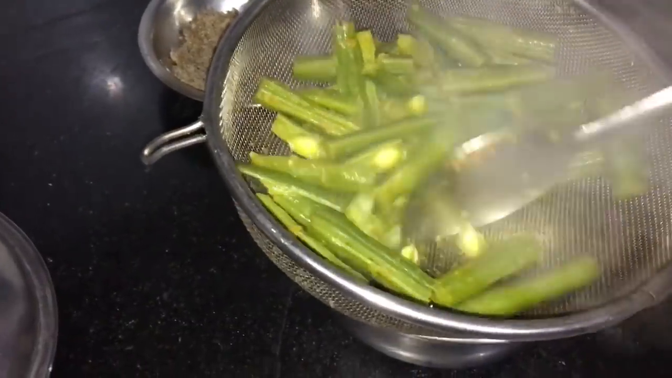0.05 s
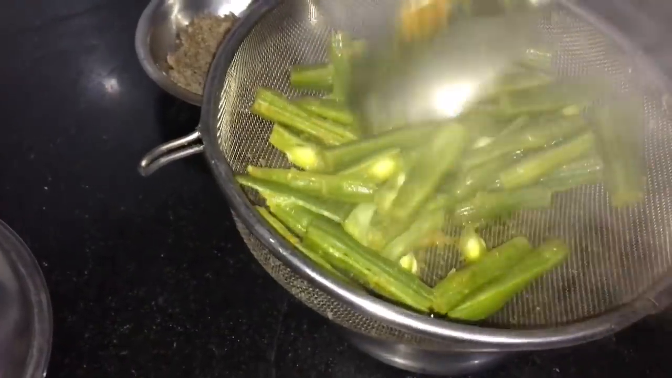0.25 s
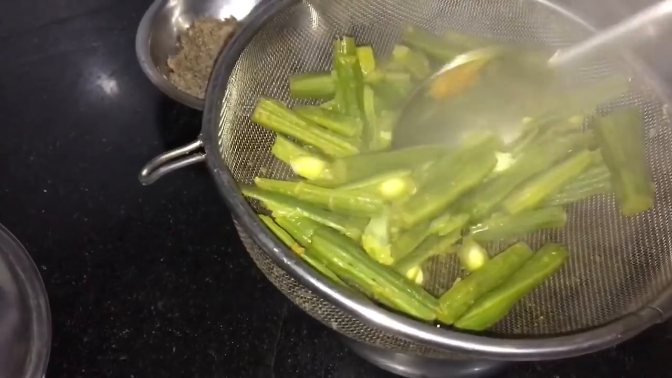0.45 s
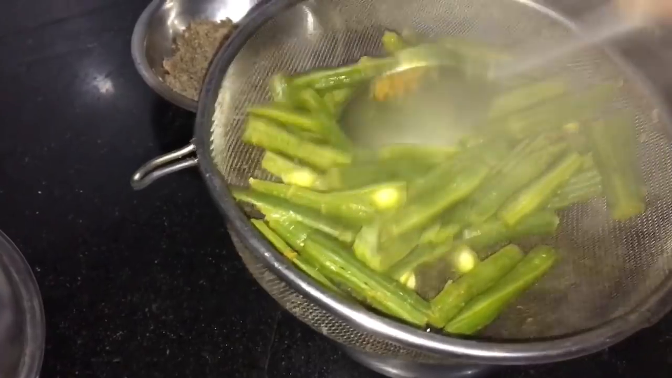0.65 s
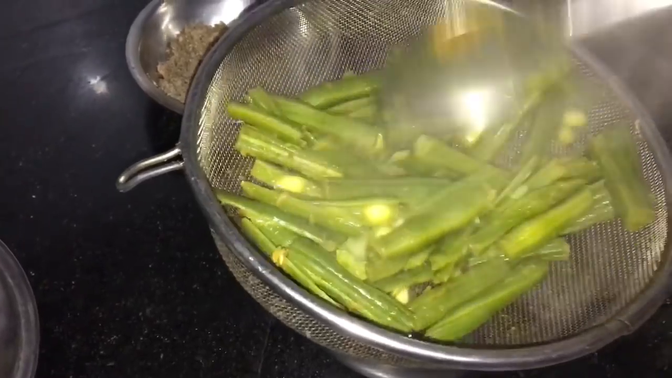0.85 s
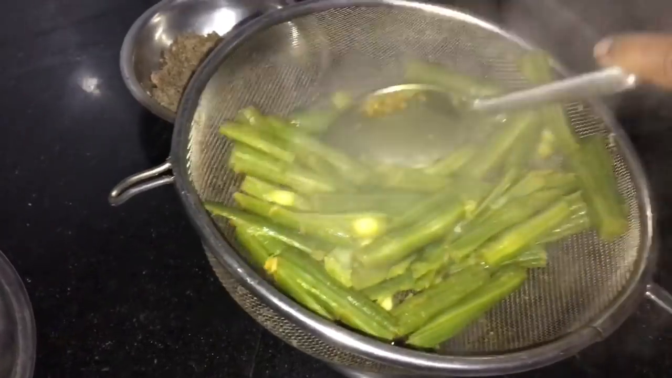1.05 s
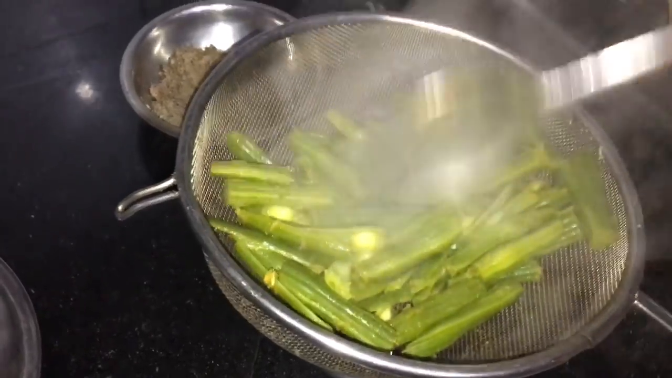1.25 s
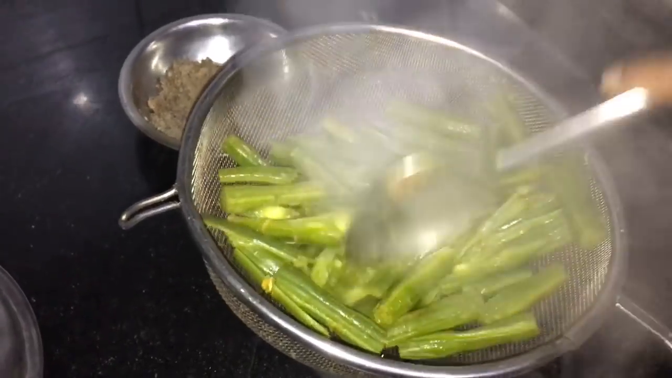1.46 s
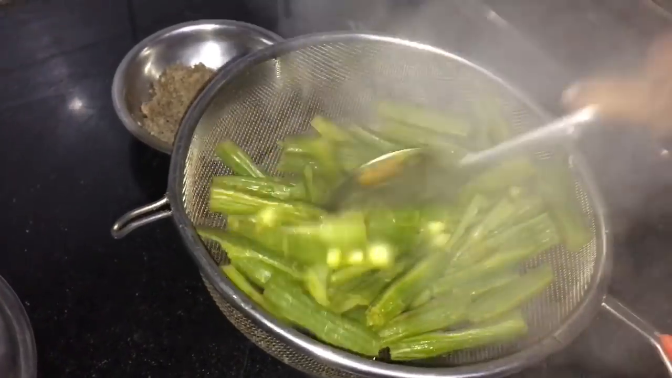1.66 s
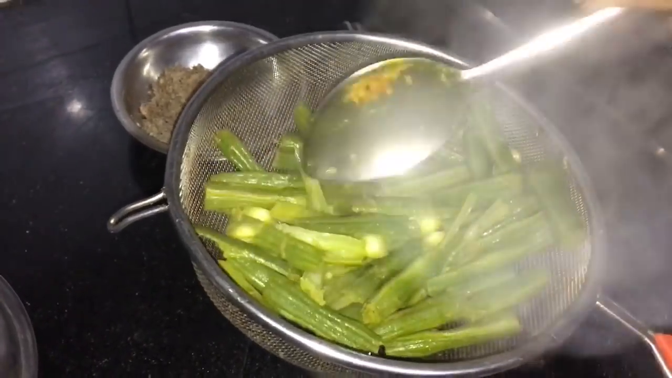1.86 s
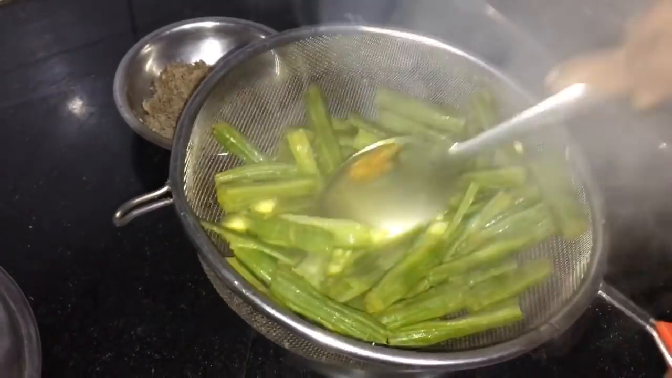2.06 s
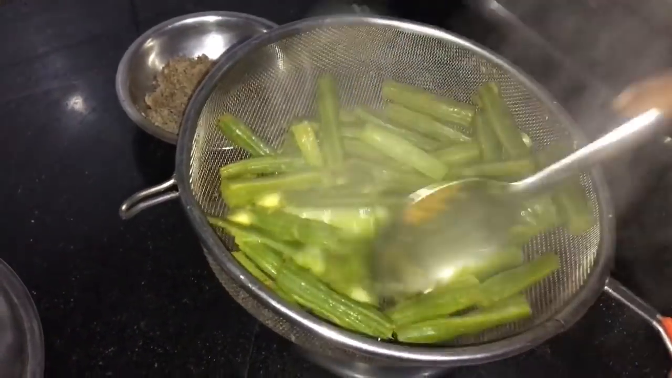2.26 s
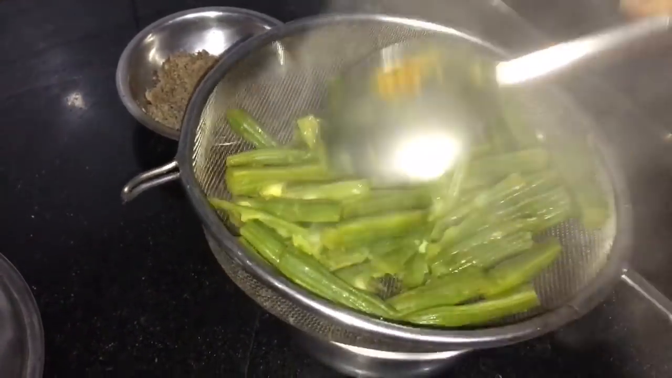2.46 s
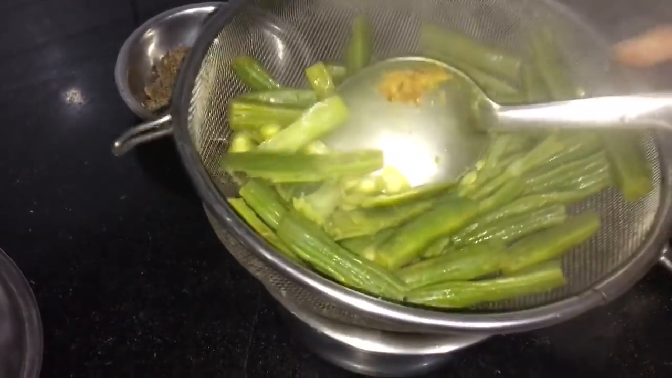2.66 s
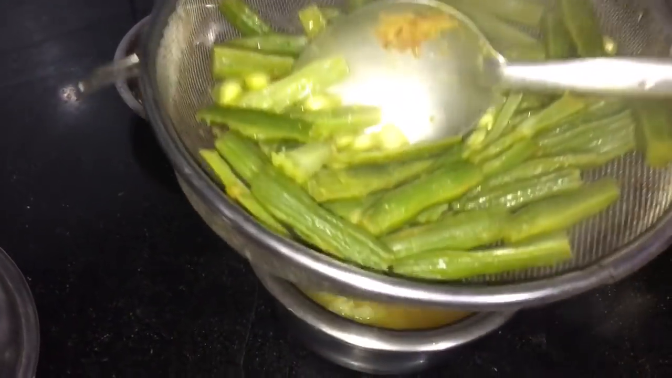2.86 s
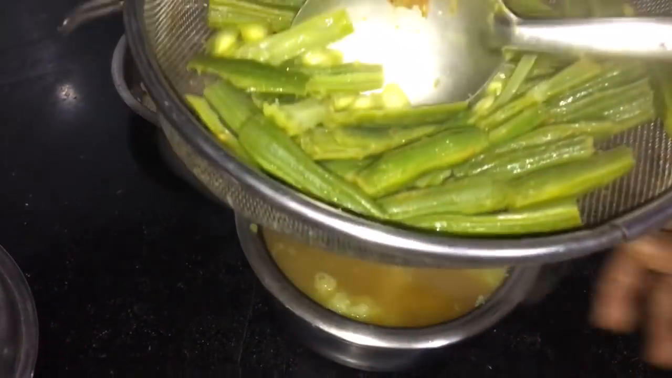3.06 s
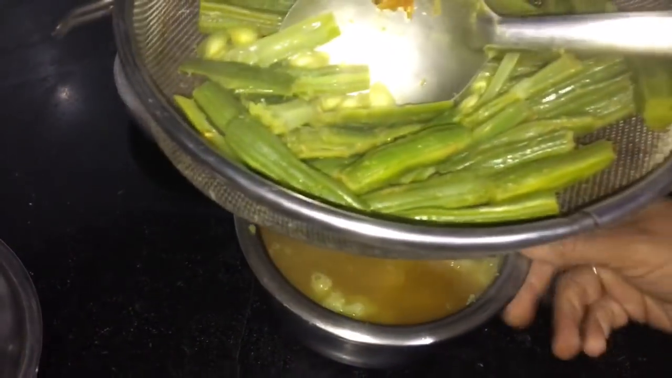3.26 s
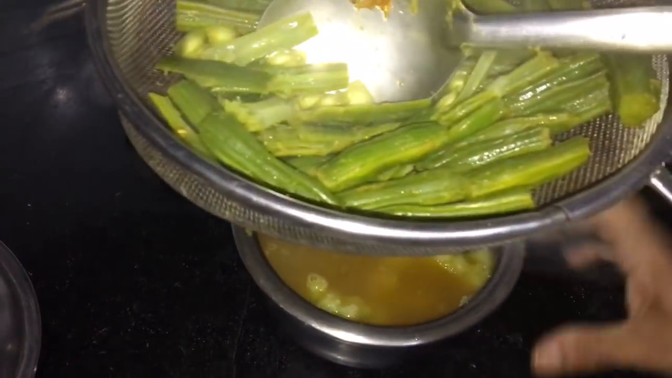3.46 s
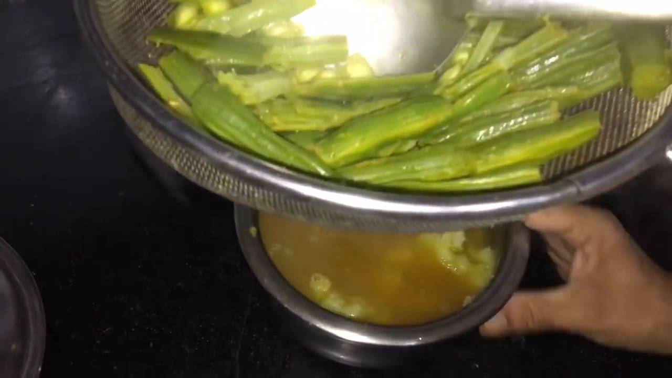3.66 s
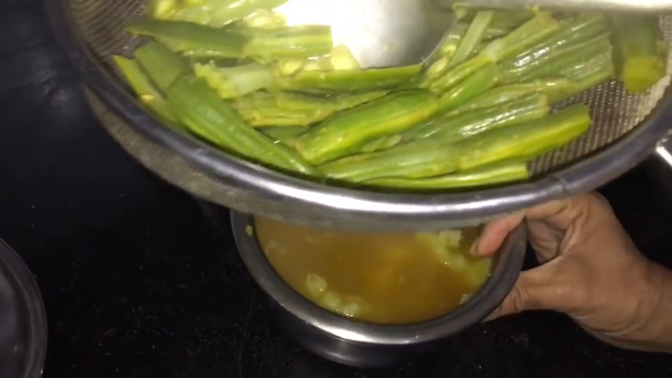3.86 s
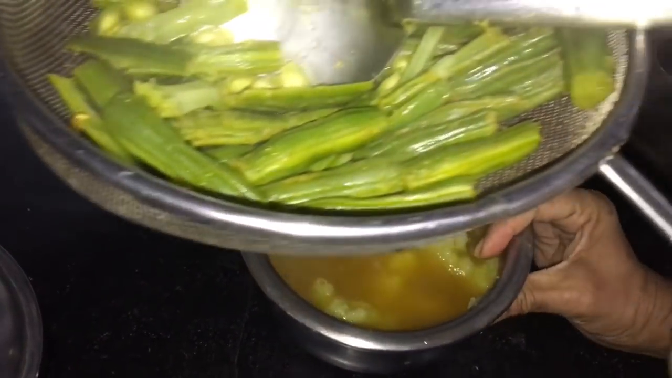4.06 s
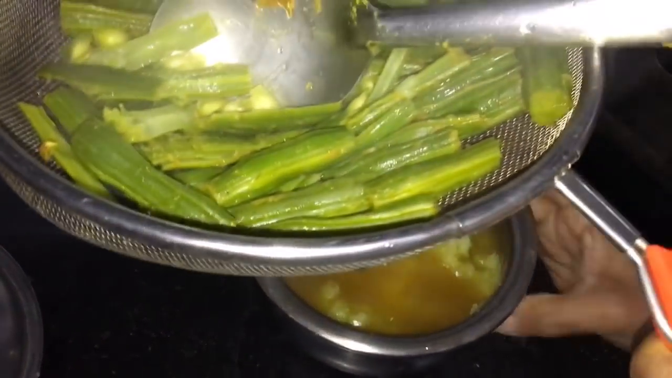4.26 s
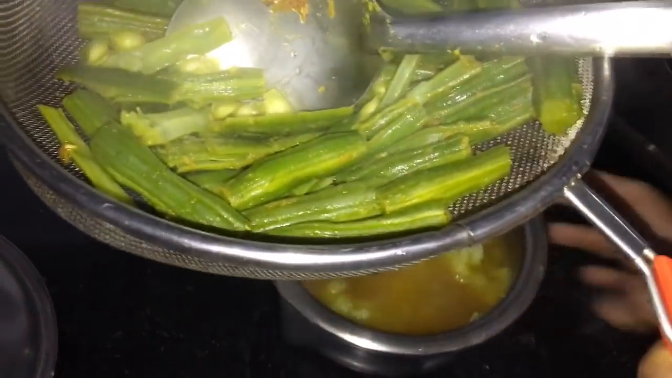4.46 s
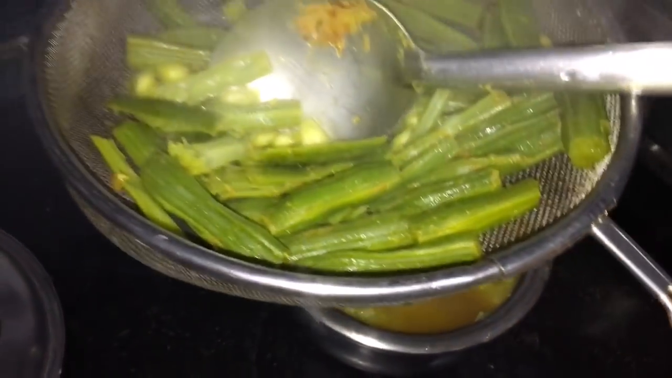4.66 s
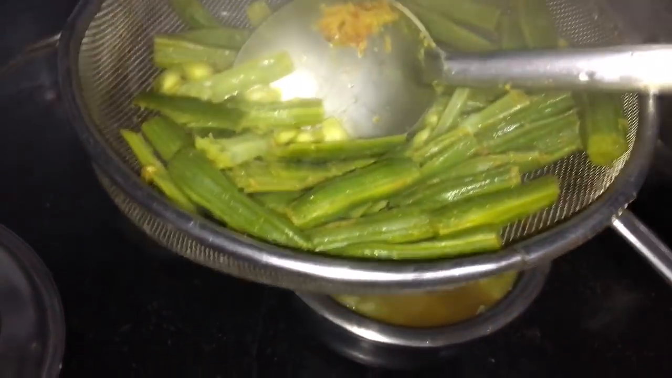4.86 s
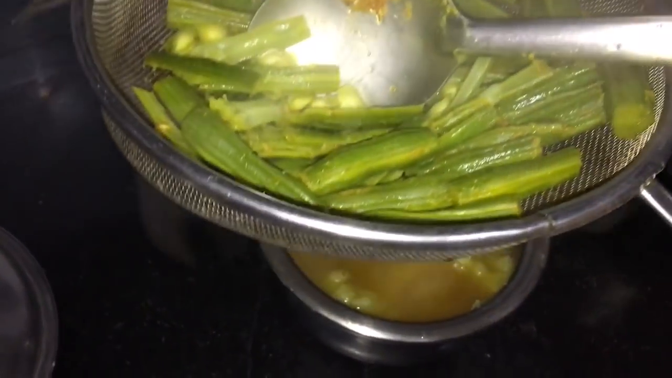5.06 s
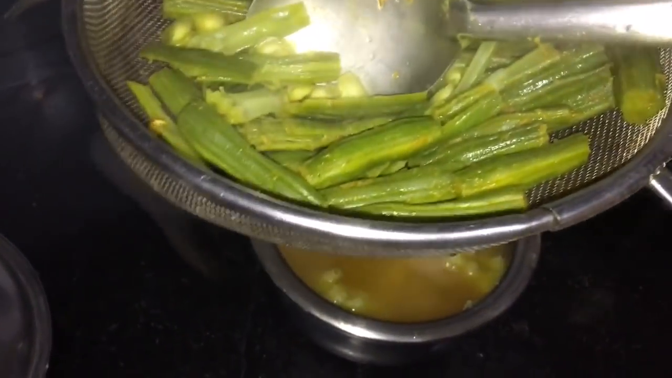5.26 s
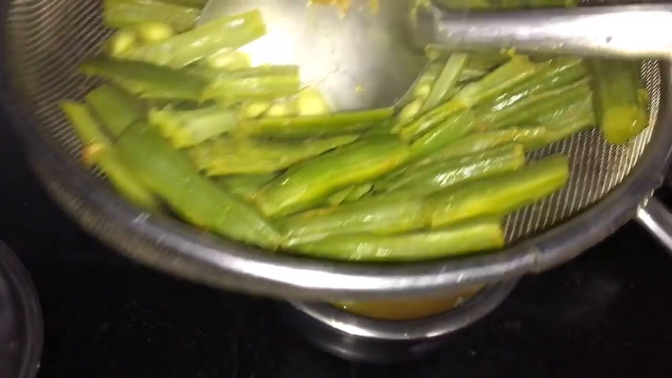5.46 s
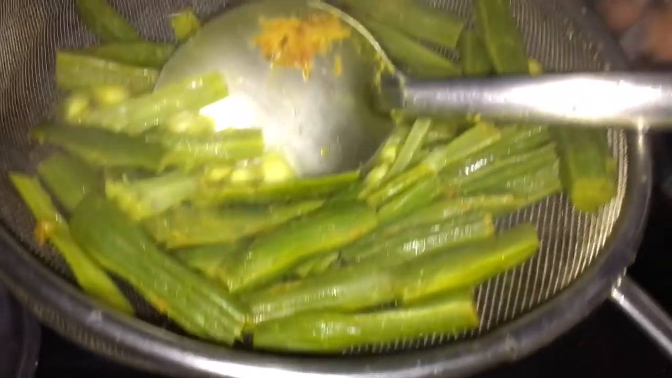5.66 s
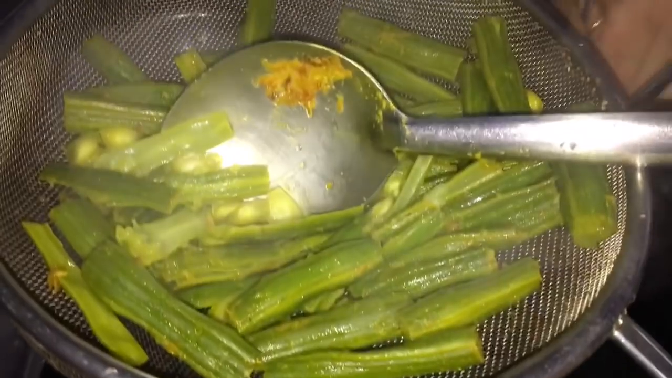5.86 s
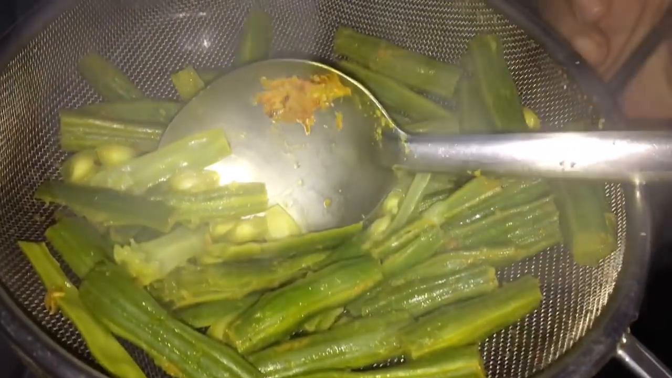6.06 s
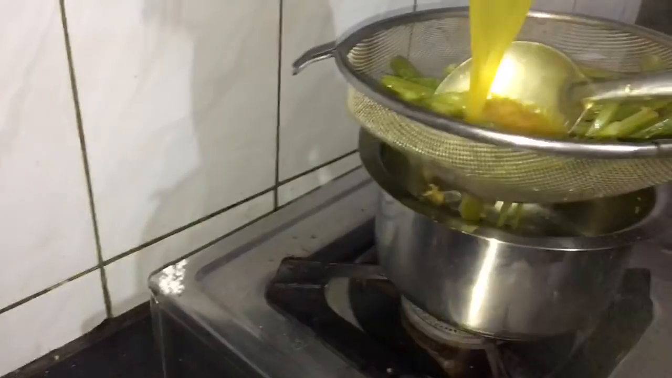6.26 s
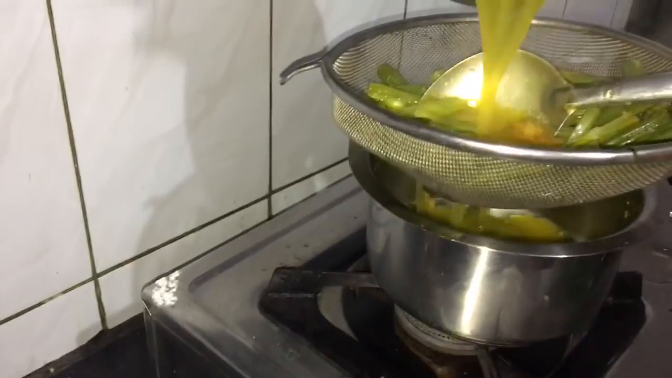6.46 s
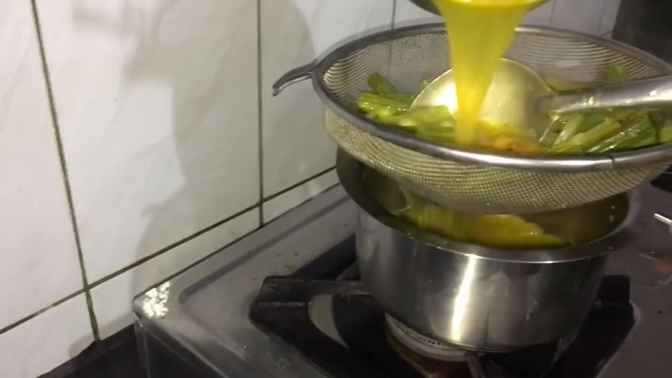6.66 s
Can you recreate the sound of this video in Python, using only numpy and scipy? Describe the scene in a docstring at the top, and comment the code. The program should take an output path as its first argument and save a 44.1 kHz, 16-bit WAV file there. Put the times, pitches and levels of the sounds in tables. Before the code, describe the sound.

Close up in a tiled kitchen, a steel ladle scrapes and digs into soft boiled pods on a wire strainer, rasping and ticking over dull knocks. One clear ringing blow follows, then near quiet with tiny squeaks and soft thuds. Utensils rattle briefly further off; finally rim, pot and handle clatter loudly and all sound stops dead. Low rumble, hum and soft hiss lie underneath.

```python
"""A steel ladle scrapes and presses boiled pods in a wire strainer: slips drum the mesh, friction rasps the wires.
One ringing ladle blow follows; then the strainer squeaks faintly on its handle and leans booming on the hob.
Utensils rattle further off as clusters of modes, then rim, pot and handle clatter in quickening contacts.
Dull knocks fall throughout. Under it all lie rumble, hum and a shifting hiss; a tiled kitchen answers the
close sounds with a noise tail, and everything stops dead just after the clatter."""
import sys
import numpy as np
from scipy import signal
from scipy.fft import rfft, irfft, next_fast_len
from scipy.io import wavfile
from scipy.ndimage import map_coordinates

SR = 44100
rng = np.random.default_rng(int(sys.argv[2]) if len(sys.argv) > 2 else 0)


def generate_wav(signal):
    """Clip the signal to [-1, 1] and save it as 16-bit WAV at the path in sys.argv[1]."""
    frames = np.transpose(np.atleast_2d(signal))
    scaled = np.clip(frames, -1, 1) * 32767
    pcm = np.round(scaled).astype(np.int16)
    wavfile.write(sys.argv[1], SR, pcm)


N = 296352
T = np.arange(N) / SR
AGE = np.arange(int(SR * .7)) / SR  # time since a contact, in seconds

# hard scrapes over bare mesh: start_s, length_s, wire_rasp_db, mesh_drum_db, frame_ring_db,
# starting_slips_per_s, force_change_over_stroke_db
SCRAPES = [(.031, 0.082, -24.5, -34, -29.5, 900, 2.5), (0.775, .072, -38, -36.5, -53.5, 524, 5),
           (1.0751, .038, -33, -28, -49.5, 604, -1.5), (1.1413, .044, -36.5, -29, -46, 420, -8.5)]
# the ladle digs into the pods and touches the mesh: touch_s, rubbing_db, tick_db, hob_bump_db
DIGS = [(.029, -41.5, -15.5, -38.5), (0.359, -48, -36, -46.5), (0.499, -58.5, -55.5, -65),
        (.713, -49.5, -39.5, -48.5), (1.048, -51, -43, -46), (1.367, -50, -32, -52.5),
        (1.697, -46, -30, -44.5), (1.828, -60.5, -47, -62), (2.001, -46, -42.5, -37),
        (2.302, -46, -22, -44.5), (2.614, -55, -37.5, -56)]
# the taut mesh as a drum: pitch_hz, level_db
MESH_COLOUR = [(60, -26.5), (330, -10), (470, -18.5), (750, -12.5), (950, -5.5), (1200, -2.5), (1900, 0.5),
               (2250, -1.5), (2600, -12.5), (4000, -20.5), (7000, -27.5), (17000, -43.5)]
# hiss of the mesh wires: pitch_hz, level_db
WIRE_COLOUR = [(300, -31), (1100, -7), (2400, 0.5), (3700, 5.5), (4500, 2), (7000, -2.5), (10000, -2),
               (11500, -4.5), (13000, -5.5), (16500, -10.5)]
# resonances of the mesh wires: pitch_hz, width_hz, level_db
WIRE_MODES = [(4020, 110, 4), (8030, 250, 1), (8300, 130, 2.5), (9630, 340, 5.5), (10370, 60, 5),
              (10300, 100, -6.5), (12300, 110, -5), (13400, 150, 1)]
# resonances of the strainer's frame: pitch_hz, width_hz, level_db
FRAME_MODES = [(1050, 26, -4), (1182, 35, 1), (3130, 15, -6), (3370, 56, -7), (3680, 5.4, -0.5),
               (3730, 10, -8), (3906, 18, 0.5), (5860, 25, -11), (12430, 150, -10)]
# the loaded strainer rubs faintly on its handle: start_s, length_s, level_db
SQUEAKS = [(3.191, .075, -73.5), (3.285, 0.026, -61.5), (3.59, 0.29, -74.5), (3.797, .025, -61.5),
           (4.408, 0.037, -65.5), (4.464, 0.061, -85)]
# resonances that sing in the squeaks: pitch_hz, width_hz, level_db
SQUEAK_MODES = [(4334, 56, 3.5), (4900, 52, -2.5), (6080, 70, -5.5), (9600, 170, -11), (12150, 170, -13)]
# stray ticks of steel on wire: start_s, level_db, pitch_hz
STRAY_TICKS = [(.542, -48, 3000), (1.535, -41, 4270), (2.763, -51.5, 4000), (3.043, -46, 4400),
               (3.813, -44.5, 4600), (5.231, -50, 8154), (5.498, -46.5, 7800)]
# steel blows: start_s, body_struck, crack_db, crack_t60_s, contact_spot_hz, ring_db, change_per_contact_db
BLOWS = [(2.7971, "ladle", -14, .021, 5900, -26.5, 0), (5.946, "rim", -11, 0.021, 3500, -17, -8),
         (6.0066, "pot", -13.5, .026, 4360, -19.5, 1.5), (6.0758, "handle", -15.5, .022, 4660, -17, -3.5)]
# chatter of each struck body: contacts, first_gap_s
CHATTER = {"ladle": (1, 0), "rim": (2, .011), "pot": (4, .0062), "handle": (2, .0045)}
# strong modes of the ladle, strainer rim, pot and handle: pitch_hz, level_db, t60_s
LADLE_MODES = [(1012, -16, .14), (1290, -18, .12), (1580, -20, .12), (2299, -20, .25), (2907, -9, .1),
               (3180, -10, .12), (5550, -13, .1), (3914, -11, .11), (5852, -15, .22), (6500, -11, .12),
               (7160, -18, .22), (8780, 0, .12), (10490, -12, .1), (11010, -18, .2), (12810, -14, .12),
               (13300, -13, .07)]
RIM_MODES = [(780, -15, .12), (2397, -9, .38), (3100, -7, .08), (3265, -5, .12), (3553, -8, .11),
             (3818, 0, .19), (4344, -3, .08), (4700, -6, .035), (4931, -11, .06), (6029, -14, .18),
             (6105, -11, .11), (8253, -15, .11), (8900, -13, .08), (9500, -15, .08), (9780, -15, .08),
             (11150, -12, .08)]
POT_MODES = [(690, -14, .2), (1040, -13, .15), (2170, -12, .1), (2778, -5, .12), (3377, -3, .11),
             (3432, -4, .11), (3914, -7, .09), (4281, 1, .1), (4350, 2, .09), (4430, -2, .08),
             (4937, -3, .08), (5760, -13, .07), (6525, -11, .06), (8597, -1, .065), (9179, -14, .15),
             (11240, -11, .08), (11920, -13, .1), (13570, -9, .05)]
HANDLE_MODES = [(1040, -6.5, .15), (1340, -20.5, 0.28), (1700, -12, 0.24), (2955, -4.5, 0.13),
                (3248, -19, 0.2), (3785, -4.5, 0.115), (4440, 2.5, .04), (4860, -0.5, 0.046),
                (4570, 3.5, 0.052), (6568, -11.5, 0.1)]
# colour of the crowd of weaker modes, ladle and pot: pitch_hz, level_db
LADLE_WASH = [(60, -49.5), (200, -27.5), (750, -15), (1200, -12), (3000, -5), (4400, -13.5), (6200, 0.5),
              (8500, -2.5), (12000, -9.5), (17000, -16.5)]
POT_WASH = [(40, -40.5), (130, -13.5), (300, -9.5), (480, -16.5), (720, -3.5), (1100, -2.5), (1600, -6.5),
            (3300, 0.5), (4600, -3.5), (5400, -8), (9500, -4), (13000, -6.5), (17000, -14.5)]
# what each struck body sounds with: strong modes, colour of the weaker crowd
BODIES = {
    "ladle": (LADLE_MODES, LADLE_WASH),
    "rim": (RIM_MODES, POT_WASH),
    "pot": (POT_MODES, POT_WASH),
    "handle": (HANDLE_MODES, POT_WASH),
}
# dull knocks on pods, bowl and pot: start_s, level_db, pitch_hz, following_thud_db
KNOCKS = [(0.015, -36.5, 1560, -58), (0.335, -44, 2030, -58), (1.987, -35.5, 1750, -50),
          (2.002, -30, 860, -34), (2.285, -39.5, 1820, -58.5), (2.477, -45.5, 950, -61.5),
          (3.870, -42.5, 840, -48.5), (4.023, -48.5, 975, -43), (4.207, -42.5, 770, -49.5),
          (6.087, -25.5, 820, -28.5)]
# jostles of the utensils: start_s, level_db
RATTLE = [(4.9599, -29.5), (4.969, -37.5), (4.981, -27), (4.993, -37.5), (5.029, -38), (5.038, -40)]
# colour of the utensils' crowd of weaker modes: pitch_hz, level_db
UTENSIL_WASH = [(60, -30), (200, -18), (1400, -16), (2700, -10.5), (3300, -2), (5000, -9), (6300, -5),
                (9000, -8), (12000, -12.5), (16000, -15.5)]
# clusters of utensil modes: pitch_hz, width_hz, level_db
RATTLE_MODES = [(510, 40, -1), (3160, 59, 3), (3800, 200, -1), (5630, 89, 2.5), (6120, 130, 4.5),
                (7720, 230, 6), (8250, 180, -0.5), (9140, 200, 5), (11050, 200, 3), (11940, 150, 2)]
# the loaded strainer leans on the hob: start_s, level_db
BUMPS = [(4.213, -43.5), (4.66, -55), (4.894, -44), (4.972, -37), (6.093, -33.5)]
# low modes of the hob: pitch_hz, level_db, t60_s
HOB_MODES = [(50, -17, 0.68), (80.5, -0.5, 0.58), (99, -1.5, 0.36), (136, -10, 0.27), (180.9, -3.5, .3),
             (250, -18.5, .2), (334, -11.5, 0.47), (497, -15.5, 0.18)]
# colour of the room rumble: pitch_hz, level_db
AIR_COLOUR = [(20, -30.5), (32, -16), (50, 3), (74, -2.5), (143, 1.5), (280, -9.5), (343, -9), (385, -17),
              (626, -15.5), (917, -20.5), (3700, -28), (7000, -36.5), (11900, -31.5), (17000, -45)]
# tones of the motor hum: pitch_hz, level_db
HUM = [(101, -69), (339, -67.5)]
# swell of the soft hiss: time_s, level_db
HISS_LEVEL = [(0, -67), (2.9, -70.5), (4.15, -74), (4.4, -63.5), (4.8, -64.5), (5.2, -67), (5.6, -78.5),
              (5.9, -83)]
# colour of the soft hiss: pitch_hz, level_db
HISS_COLOUR = [(500, -10.5), (2000, 0.5), (4000, -3.5), (9000, -3.5), (12000, -10), (17000, -13.5)]
# decay of the tiled kitchen: pitch_hz, t60_s
KITCHEN_DECAY = [(100, 0.74), (1200, 0.46), (4000, 0.37), (9000, 0.33), (16000, 0.067)]

END_SPEED = .5  # share of its speed that the ladle keeps at the end of a stroke
FORCE_SHAPE = .4  # exponent on the half sine of force; lower holds longer
# digs: rubbing builds up to the touch, then dies as the pods stop the ladle
DIG_ATTACK_S, DIG_T60_S, DIG_LENGTH_S = .02, 0.31, .13
DIG_SLIPS_PER_S = 410  # at the start of the dig
DIG_DRUM_DB, DIG_FRAME_DB = -4.5, -3.5  # relative to the rubbing
TOUCH_HZ, TICK_T60_S = 4300, .006
# single wires catch after the touch: how many, within what time, how loud over the rubbing at first
CATCHES_PER_DIG, CATCH_SPREAD_S, CATCH_DB = 4, 0.048, 5.5
GAP_SHRINK = .8  # each gap of a chatter against the one before
REBOUND_S, REBOUND_DB, REBOUND_PITCH = .022, -8.5, 0.93  # each knock comes back once, softer and duller
THUD_LAG_S, THUD_HZ = 0.017, 312  # the vessel settles after the knock
# pods topple after each dig: how many, within what time, how loud, around what pitch
PODS_PER_DIG, POD_FALL_S, POD_DB, POD_HZ = 2, 0.096, -54, 696
BUMP_LAG_S = 0.01  # the hob gives way just after the touch
CLIP_TOP = .7  # loud peaks are rounded off towards this level
END_S, TOP_HZ = 6.186, 16900  # where the sound stops; upper band limit


def amp(db):
    """Decibels to amplitude."""
    return 10 ** (np.asarray(db) / 20)


def unit(x):
    """Scale to rms 1."""
    return x / np.sqrt(np.mean(x ** 2) + 1e-20)


def along(points, hz):
    """Read a curve of (Hz, value) points on a log frequency axis."""
    f, v = np.transpose(points)
    return np.interp(np.log(hz + 1), np.log(f), v)


def fade(t, t60):
    """Exponential decay that loses 60 dB in t60 seconds."""
    return np.exp(-np.log(1000) * t / np.maximum(t60, 1e-4))


def add(track, s, x):
    """Mix x into the track at time s."""
    i = max(round(s * SR), 0)
    track[i:i + len(x)] += x[:len(track) - i]


def filtered(x, gain):
    """Causal filter of unit energy with the given gain over frequency."""
    m = 2 * next_fast_len(len(x) // 2 + 4096)
    cep = irfft(np.log(unit(gain(np.fft.rfftfreq(m, 1 / SR))) + 1e-6))
    # folding the cepstrum forward gives minimum phase: no sound ahead of the contact
    cep[1:m // 2] *= 2
    cep[m // 2 + 1:] = 0
    return irfft(rfft(x, m) * np.exp(rfft(cep)))[:len(x)]


def coloured(x, points):
    """Send x through a (Hz, dB) spectrum."""
    return filtered(x, lambda hz: amp(along(points, hz)))


def resonance(hz, centre, width):
    """Gain of one resonance."""
    return hz * width / np.hypot(centre ** 2 - hz ** 2, hz * width)


def body(hz, modes):
    """Gain of a set of (Hz, width Hz, dB) resonances, summed in power."""
    return np.sqrt(sum((amp(db) * resonance(hz, centre, width)) ** 2 for centre, width, db in modes))


def wobble(rate, size=N):
    """A smooth random curve, rate knots a second."""
    knots = rng.standard_normal(int(N * rate / SR) + 4)
    return map_coordinates(knots, [T[:size] * rate])


def burst(t60):
    """Dying white noise."""
    return rng.standard_normal(len(AGE)) * fade(AGE, t60)


def ring(modes, scatter_db):
    """Damped modes, starting near rms 1, at new strengths for each blow."""
    hz, db, t60 = np.transpose(modes)[:, :, None]
    size = amp(db + scatter_db * rng.standard_normal(hz.shape))
    waves = np.sin(2 * np.pi * (hz * AGE + rng.random(hz.shape))) * fade(AGE, t60)
    return np.sqrt(2) * (size * waves).sum(0) / np.linalg.norm(size)


def taps(rows, t60, width, click_db):
    """Short contacts that die at once, each around its own pitch, with a broad click on top."""
    out = np.zeros(N)
    for s, db, centre in rows:
        def gain(hz):
            tone = resonance(hz, centre, width * centre) ** 2
            return tone + amp(click_db) * resonance(hz, centre, 2 * centre)
        add(out, s, amp(db) * filtered(burst(t60), gain))
    return out


def scrapes(spot_db=1.9, uneven_db=2):
    """Slips drum the mesh; uneven friction rasps the wires and feeds the frame, which varies by spot."""
    drum, rasp, frame = np.zeros((3, N))
    for s, force, rate, rasp_db, drum_db, frame_db in strokes():
        slips, friction = slipping(force, rate)
        friction = friction * unit(amp(uneven_db * wobble(160, size=len(force))))
        modes = [(hz, width, db + spot_db * rng.standard_normal()) for hz, width, db in FRAME_MODES]
        # room for the frame to ring on after the stroke
        drive = np.pad(friction, (0, len(AGE) - len(friction)))
        add(drum, s, -amp(drum_db) * slips)
        add(rasp, s, amp(rasp_db) * friction)
        add(frame, s, amp(frame_db) * filtered(drive, lambda hz: body(hz, modes)))
    wires = filtered(rasp, lambda hz: amp(along(WIRE_COLOUR, hz)) + body(hz, WIRE_MODES))
    return coloured(drum, MESH_COLOUR) + frame + wires


def strokes():
    """Every move of the ladle as (start s, force, slips a second, rasp dB, drumming dB, frame dB)."""
    for s, length, rasp_db, drum_db, frame_db, rate, lean_db in SCRAPES:
        force = press(length)
        force = unit(force * amp(np.linspace(0, lean_db, len(force))))
        yield s, force, rate, rasp_db, drum_db, frame_db
    t = AGE[AGE < DIG_LENGTH_S]
    force = np.minimum(t / DIG_ATTACK_S, fade(t - DIG_ATTACK_S, DIG_T60_S))
    for s, db, _, _ in DIGS:
        yield s - DIG_ATTACK_S, force, DIG_SLIPS_PER_S, db, db + DIG_DRUM_DB, db + DIG_FRAME_DB


def press(length):
    """The force of one stroke: it comes quickly, holds and lets go."""
    half_sine = np.sin(np.linspace(0, np.pi, int(max(length, .005) * SR)))
    return np.abs(half_sine) ** FORCE_SHAPE


def slipping(force, rate, slip_t60=0.0099, rub=1.0, size_db=1.0, jitter=.35, swell=0.59, grit_db=1.0):
    """The slowing ladle catches wire after wire: slips and friction, both as strong as the force."""
    n = len(force)
    chance = rng.standard_normal((200, 2))  # spacing and size of up to 200 slips
    wires_passed = np.cumsum(rate * END_SPEED ** np.linspace(0, 1, n)) / SR
    gaps = np.exp(jitter * chance[:, 0])
    # the first wire lies only a fifth of its gap away
    at = np.searchsorted(wires_passed, np.cumsum(gaps) - .8 * gaps[0])
    slips = np.bincount(at[at < n], amp(size_db * chance[at < n, 1]), n)
    # friction flares after each slip, on top of steady rubbing, and grows faster than the force
    flares = unit(np.convolve(slips, fade(AGE[:n], slip_t60))[:n])
    grip = (flares + rub) * force ** (1 + swell)
    noise, grit = rng.standard_normal((2, len(AGE)))[:, :n]
    strength = np.sqrt(np.mean(force ** 2))
    return strength * unit(slips * force), strength * unit(grip * noise * amp(grit_db * grit))


def ticks(pitch_octaves=1.2, loss_db=9):
    """Each dig ticks on the mesh, then a few wires catch, the later the fainter; stray ticks join them."""
    rows = list(STRAY_TICKS)
    for s, rub_db, tick_db, _ in DIGS:
        rows.append((s, tick_db, TOUCH_HZ))
        for late, high in rng.random((CATCHES_PER_DIG, 2)):
            db = rub_db + CATCH_DB - loss_db * late
            rows.append((s + late * CATCH_SPREAD_S, db, TOUCH_HZ * 2 ** (pitch_octaves * (high - .5))))
    return taps(rows, t60=TICK_T60_S, width=1.1, click_db=-18)


def squeaks(uneven_db=3):
    """Light, uneven rubbing of steel on steel sings in a few resonances."""
    force = np.zeros(N)
    for s, length, db in SQUEAKS:
        add(force, s, amp(db) * press(length))
    rubbing = force * amp(uneven_db * wobble(65)) * rng.standard_normal(N)
    return filtered(rubbing, lambda hz: body(hz, SQUEAK_MODES))


def clinks(spot_db=9, spot_width=0.3, wash_t60=0.13, wash_db=-16):
    """Blows chatter ever faster; contacts crack at their spot's pitch, wake weak modes and ring strong ones."""
    out = np.zeros(N)
    for s, name, crack_db, crack_t60, spot, ring_db, step_db in BLOWS:
        modes, wash = BODIES[name]
        contacts, gap = CHATTER[name]

        def contact(hz):
            peak = amp(spot_db) * resonance(hz, spot, spot_width * spot) ** 2
            return amp(along(wash, hz)) * (1 + peak)

        for k in range(contacts):
            crack = filtered(burst(crack_t60), contact)
            crack = crack + amp(wash_db) * coloured(burst(wash_t60), wash)
            ringing = ring(modes, scatter_db=3.0)
            add(out, s, amp(k * step_db) * (amp(crack_db) * crack + amp(ring_db) * ringing))
            s += gap * GAP_SHRINK ** k
    return out


def knocks(pod_octaves=1.0):
    """A dull knock, its rebound and the vessel's low settling thud; soft pods topple after each dig."""
    rows = []
    for s, db, centre, thud_db in KNOCKS:
        rows.append((s, db, centre))
        rows.append((s + REBOUND_S, db + REBOUND_DB, centre * REBOUND_PITCH))
        rows.append((s + THUD_LAG_S, thud_db, THUD_HZ))
    for s, _, _, _ in DIGS:
        for late, high in rng.random((PODS_PER_DIG, 2)):
            rows.append((s + late * POD_FALL_S, POD_DB, POD_HZ * 2 ** (pod_octaves * (high - .5))))
    return taps(rows, t60=0.029, width=0.66, click_db=-26.5)


def rattle(crack_t60=0.032, wash_t60=0.24, wash_db=-9):
    """A heap of thin steel jostles: so many modes that only their clusters stand out."""
    out = np.zeros(N)
    for s, db in RATTLE:
        add(out, s, amp(db) * (burst(crack_t60) + amp(wash_db) * burst(wash_t60)))
    return filtered(out, lambda hz: np.hypot(amp(along(UTENSIL_WASH, hz)), body(hz, RATTLE_MODES)))


def bumps(rise_t60=0.049):
    """Every dig and every lean of the strainer sets the hob's low modes booming."""
    out = np.zeros(N)
    for s, db in BUMPS + [(s + BUMP_LAG_S, db) for s, _, _, db in DIGS]:
        add(out, s, amp(db) * ring(HOB_MODES, scatter_db=3) * (1 - fade(AGE, rise_t60)))
    return out


def background(air_db=-60, waver_db=2):
    """Room rumble, a motor hum wavering in level and phase, and a soft hiss that swells and sinks."""
    air = amp(air_db + 0.31 * wobble(3.6)) * coloured(rng.standard_normal(N), AIR_COLOUR)
    hum = np.zeros(N)
    for hz, db in HUM:
        tone = np.sqrt(2) * np.sin(2 * np.pi * hz * T + 1.2 * wobble(19))
        hum += amp(db + waver_db * wobble(13)) * tone
    hiss_level = amp(np.interp(T, *np.transpose(HISS_LEVEL)))
    hiss = hiss_level * coloured(rng.standard_normal(N), HISS_COLOUR)
    return air + hum + hiss


def kitchen(x, wet_db, build_t60=0.044):
    """Direct sound plus the tiled room's tail, in which treble dies first."""
    hz, t, z = signal.stft(rng.standard_normal(len(AGE)), SR, nperseg=256)
    z = z * fade(t, along(KITCHEN_DECAY, hz)[:, None])
    tail = signal.istft(z, SR)[1][:len(AGE)] * (1 - fade(AGE, build_t60))
    return x + amp(wet_db) * signal.fftconvolve(x, tail / np.linalg.norm(tail))[:N]


def scene():
    """Stirring, knocks and steel blows close by, the utensils further off, all over the background."""
    stirring = scrapes() + squeaks() + ticks()
    near = kitchen(stirring, wet_db=-14.5) + kitchen(knocks(), wet_db=-12.5) + kitchen(clinks(), wet_db=-14.5)
    far = kitchen(rattle(), wet_db=-10.0)
    return (near + far + bumps() + background())[None]


def record(dry):
    """Loud peaks are rounded off and the sound stops dead; nothing above the band limit is kept."""
    rounded = dry / (1 + (dry / CLIP_TOP) ** 4) ** (1 / 4)
    m = next_fast_len(N + SR // 2)
    spectrum = rfft(rounded * (T < END_S), m)
    return irfft(spectrum * (np.fft.rfftfreq(m, 1 / SR) < TOP_HZ), m)[:, :N]


dry = scene()
out = record(dry)
generate_wav(out)
```